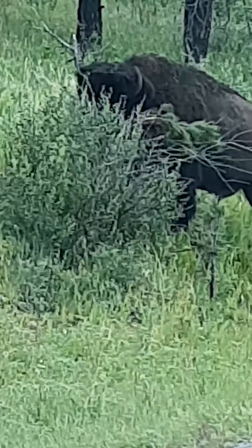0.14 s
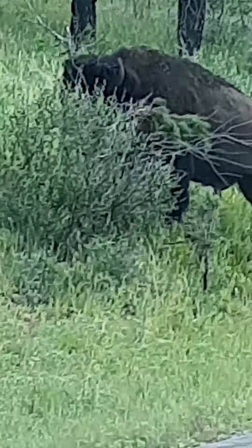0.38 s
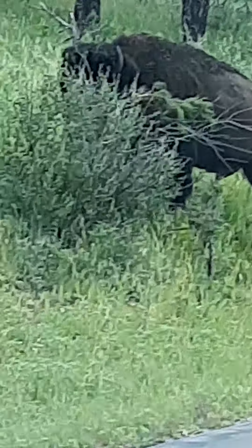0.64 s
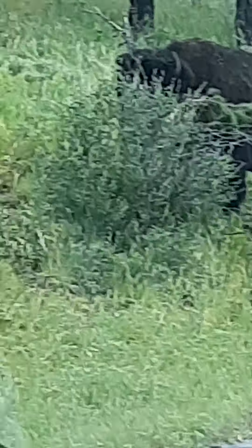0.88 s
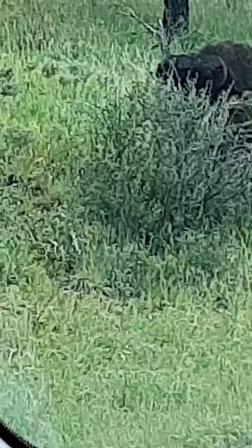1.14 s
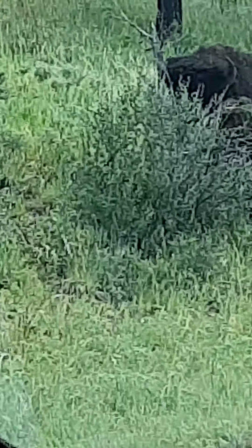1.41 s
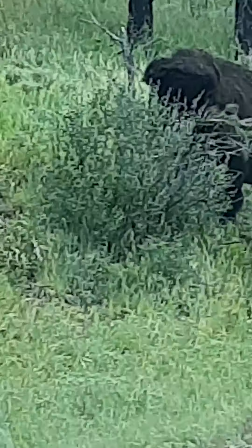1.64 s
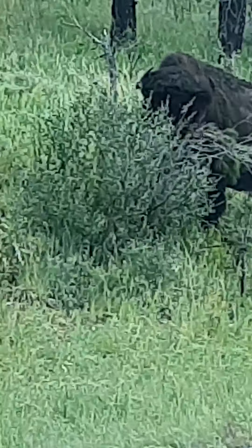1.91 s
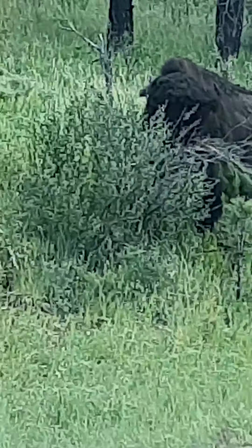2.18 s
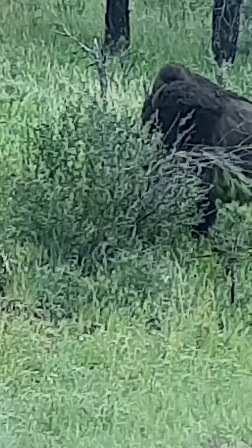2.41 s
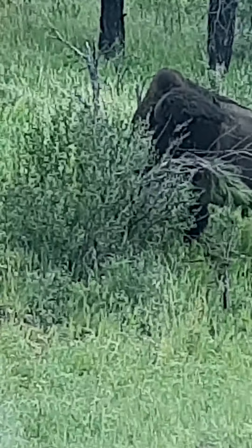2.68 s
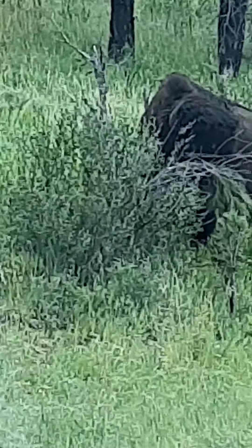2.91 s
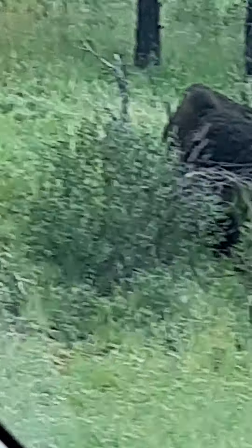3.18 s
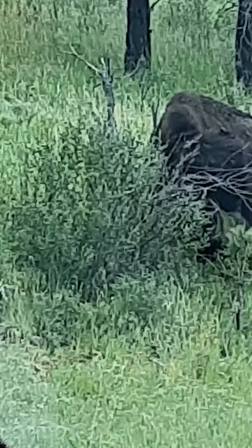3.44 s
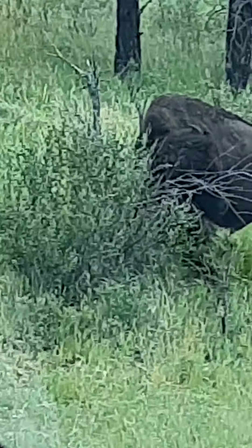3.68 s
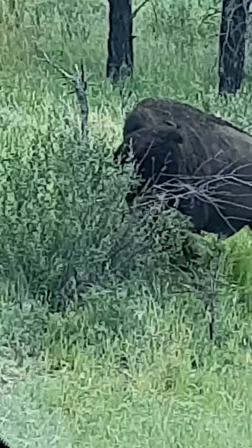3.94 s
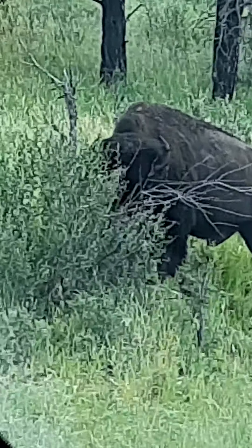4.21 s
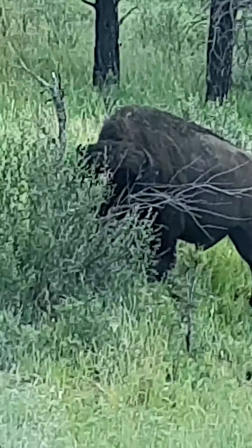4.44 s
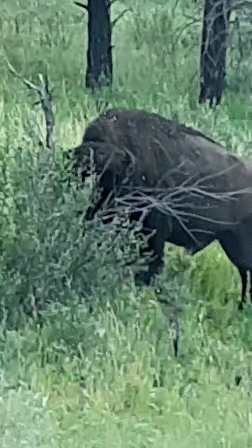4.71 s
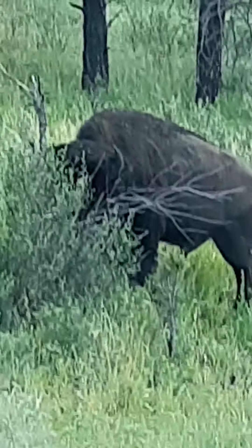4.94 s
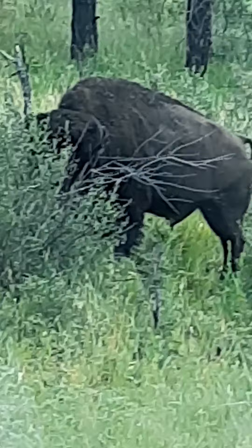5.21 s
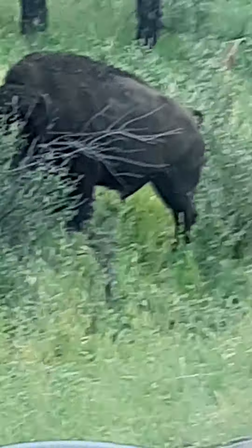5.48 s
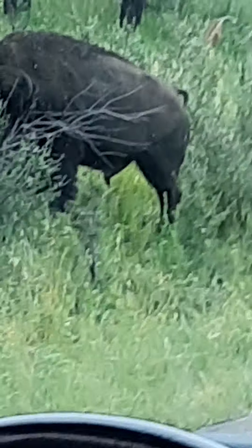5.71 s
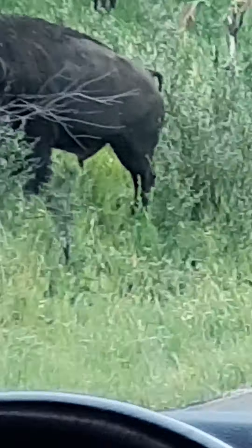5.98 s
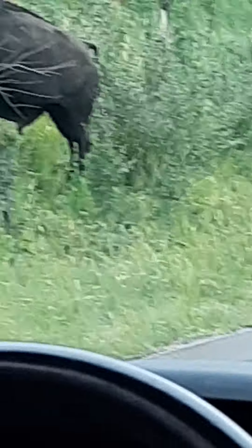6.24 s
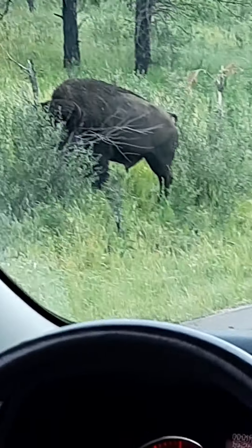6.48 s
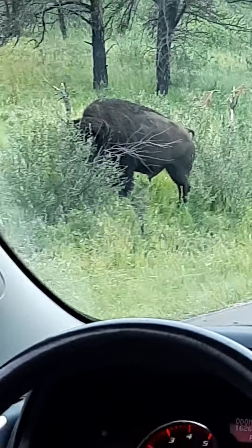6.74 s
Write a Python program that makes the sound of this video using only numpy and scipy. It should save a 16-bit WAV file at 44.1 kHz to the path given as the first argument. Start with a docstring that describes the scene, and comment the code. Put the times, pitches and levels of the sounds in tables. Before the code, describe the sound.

Inside a slowly rolling car, recorded on a handheld stereo phone. A low, rounded engine boom near 70 hertz swells in from the start, wavering in strength, and climbs to about 82 hertz by 2.4 s, with a thicker buzz of higher engine tones, then sinks. Beneath are soft road rumble and faint airy hiss; cloth rustles lightly, more noticeably from 0.6 to 1.8 s. Around 3.1 s come faint dashboard knocks and thin rubbing squeaks to 3.5 s, with tiny ticks. Muffled low bumps cluster from 4.0 to 5.5 s. At 4.7 s the driver lifts off; the boom drops sharply and pitch falls to 56. Small taps at 5.5 s lead to one very loud, dry, bright snap at 5.59 s, hard right. Rustle swells near 6 s, the engine revives modestly with a very faint whine, low bodywork groans, and brittle trim creaks click at 6.2 to 6.75 s.

```python
"""A six-cylinder engine booms in the cabin of a slowly rolling car until the driver lifts off: sines
on the crankshaft orders. Soft bumps and groans are swelling low notes; road rumble, air hiss and
cloth rustle are flickering coloured noise. Trim creaks, dashboard knocks and a finger snapping on the
phone case beside the right microphone set damped sines ringing. Loose parts tick, and thin squeaks
are rough rising tones."""
import sys
import numpy as np
from scipy import signal
from scipy.fft import rfft, irfft, next_fast_len
from scipy.io import wavfile
from scipy.ndimage import uniform_filter1d

SR = 44100
rng = np.random.default_rng(int(sys.argv[2]) if len(sys.argv) > 2 else 0)


def wav_out(sig):
    """Save sig, one row per channel (or a flat mono array), as 16-bit PCM at SR to the path in sys.argv[1]."""
    wavfile.write(sys.argv[1], SR, np.round(np.clip(np.atleast_2d(sig).T, -1, 1) * 32767).astype(np.int16))


def makeup_ratio(level_db):
    """Linear amplitude ratio for a level in decibels (20 dB per factor of ten)."""
    decades = np.asarray(level_db, float) / 20
    return 10 ** decades


N = 302676
T = np.arange(N) / SR  # time of each sample in seconds

# How fast the cylinders fire, three times a crankshaft turn: [t/s, f/Hz]
FIRING_RATE = [(0, 66.96), (.15, 68.97), (.5, 71.62), (1.35, 76.07), (1.8, 81.25), (2.4, 82.3), (2.6, 80.9),
               (2.8, 78.15), (3, 76.38), (3.35, 73.65), (4, 72.08), (4.72, 68.24), (5.06, 61.54),
               (5.35, 56.15), (5.8, 56.12), (6.2, 63), (6.6, 65.54), (6.86, 65.2)]
# Loudness of the firing boom: [t/s, level/dB]
BOOM_LEVEL = [(0, -36.5), (.27, -28.5), (.53, -23.5), (.69, -27), (.82, -39), (.97, -29.5), (1.36, -26.5),
              (1.57, -29.5), (1.97, -25), (2.62, -27.5), (2.81, -31.5), (2.98, -27), (3.28, -25.5),
              (4.07, -26.5), (4.39, -24), (4.53, -28.5), (4.68, -28), (4.89, -51), (5.1, -37.5),
              (5.33, -52), (5.5, -39), (5.76, -39.5), (5.88, -48), (6.1, -42), (6.38, -56), (6.5, -37),
              (6.7, -42), (6.86, -52)]
# Engine tones in three families: [order/cycles per crankshaft turn, level within its family/dB]
SHAKE_ORDERS = [(1.5, -6), (2, -7), (2.5, -17)]
EXHAUST_ORDERS = [(3.5, -14.5), (4, -3), (4.5, -6.5), (5, -11), (6, 0), (7, -10.5), (8, -7.5), (9, -9.5)]
INTAKE_ORDERS = [(10.5, -2.5), (12, -0.5), (13.5, -11.5), (15, 2.5)]
# Loudness of the gear whine: [t/s, level/dB]
WHINE_LEVEL = [(0, -70), (.5, -66), (1, -79.5), (6.2, -79), (6.45, -61), (6.86, -66)]
# Finger taps on the case: [t/s, peak level at the right port/dB, left minus right/dB]
CASE_TAPS = [(5.513, -34, -18), (5.5193, -22.5, -29), (5.58, -35, -23), (5.5908, -2.5, -46),
             (6.0525, -48, -8), (6.072, -46, -8), (6.079, -54, -8)]
# Ringing notes of the case, then of its back plate: [f/Hz, level/dB, time to fall 60 dB/s]
CASE_MODES = [(888.6, -12, 0.023), (1520, 0, 0.0045), (2600, 4.5, 0.0031), (3780, 8.5, 0.0014),
              (5760, -4, 0.0046), (8300, -7.5, 0.0019), (11140, 1, 0.0028), (11800, -4.5, 0.0022),
              (13900, 4, 0.0013)]
BACK_PLATE_MODES = [(390, 0, 0.036)]
# Soft bumps that drum a cabin panel: [t/s, peak level of the note/dB, f/Hz]
PANEL_BUMPS = [(3.686, -43, 269), (4.029, -43, 329), (4.092, -34.5, 297.8), (4.139, -38, 287),
               (4.223, -44.5, 313), (4.322, -37, 314), (4.36, -40, 336), (4.396, -33, 303),
               (4.549, -39, 295.4), (4.58, -36.5, 316), (4.6, -33.5, 326), (4.64, -40, 370),
               (4.846, -34, 290), (4.876, -37.5, 298.2), (4.897, -37.5, 323), (5.035, -40, 303.8),
               (5.07, -37, 289), (5.126, -41, 298), (5.236, -35, 295), (5.274, -37.5, 325),
               (5.315, -46, 292), (5.462, -28.5, 292), (5.482, -32, 317.7), (6.066, -38.5, 325),
               (6.152, -42, 287), (6.239, -41, 316), (6.505, -42, 300), (6.676, -36, 292)]
# Low notes in the bodywork: [t/s, peak level/dB, starting f/Hz]
BODY_GROANS = [(6.35, -41.5, 248.3), (6.4, -43, 353), (6.56, -50, 211)]
# Creaks of the trim, then knocks in the dashboard: [t/s, peak level at the right port/dB, scrape/s]
TRIM_CREAKS = [(4.605, -47.5, 0.016), (4.649, -47.5, 0.012), (5.536, -41.5, 0.024), (6.21, -44, 0.0076),
               (6.218, -42, .004), (6.2278, -34, 0.0027), (6.232, -38.5, .005), (6.278, -46, 0.012),
               (6.293, -45.5, 0.013), (6.482, -36.5, 0.0025), (6.5247, -30.5, 0.0027),
               (6.5442, -29.5, 0.0036), (6.557, -33.5, 0.002), (6.565, -38, 0.0022), (6.5744, -32, 0.002),
               (6.583, -36.5, .002), (6.589, -44, .002), (6.7286, -36.5, .0016), (6.733, -41, 0.0018),
               (6.7364, -34, 0.0027), (6.744, -38, 0.0065)]
DASH_KNOCKS = [(3.063, -39.5, 0.0036), (3.074, -40.5, .0035), (3.088, -51, 0.013)]
# Ringing notes of trim, dry clatter and dashboard: [f/Hz, level/dB, time to fall 60 dB/s]
TRIM_MODES = [(1140, -20, 0.02), (1770, 2, 0.055), (2170, 3, 0.018), (2600, -1, 0.022), (2920, -9, .016),
              (4520, -24, 0.028)]
CLATTER_MODES = [(2330, 7, 0.0092), (5590, -2.5, 0.012), (6170, -4.5, 0.013), (7100, -10, 0.0046),
                 (11440, -4.5, 0.0034)]
DASH_MODES = [(1480, 11, 0.032), (1680, 5, .02), (2180, 5, .022), (2600, -3, 0.015), (2990, 3, 0.025),
              (3250, 0, 0.02), (4190, -4, .012)]
# Thin rubbing squeaks: [t/s, length/s, peak level before the stutter/dB, starting f/Hz]
RUB_SQUEAKS = [(3.082, .1, -61, 1500), (3.18, .18, -68, 1520), (3.36, .055, -61, 1555),
               (3.415, .055, -64, 1570)]
# Faint ticks of loose parts: [t/s, peak level at the right port/dB, f/Hz]
LOOSE_TICKS = [(.229, -49, 710), (1.144, -49, 11000), (2.616, -51.5, 2640), (2.781, -54, 2600),
               (2.97, -54, 2600), (3.2202, -45.5, 2750), (3.462, -47, 2700), (3.701, -50.5, 2795),
               (3.919, -48, 11140), (5.292, -55, 1542), (5.307, -51, 1340), (5.345, -52, 2617),
               (5.521, -37, 460), (6.028, -42, 846), (6.029, -50, 2600)]
# Cloth rustle over time: [t/s, level/dB, brightness/dB per octave]
RUSTLE_LEVEL = [(0, -76, 3), (.2, -79.5, 2), (.38, -69.5, 2.5), (.44, -66.5, 1), (.52, -70.5, -1),
                (.63, -61.5, -1), (1.18, -63, 1), (1.28, -68.5, 0.5), (1.51, -64.5, -1.5), (1.89, -74, 0),
                (2.3, -75, 0), (2.69, -77.5, -1.5), (3.06, -68.5, -2), (3.4, -71, 2), (3.53, -77, 2),
                (3.69, -67, -1), (3.9, -67, -3.5), (4.15, -66, 2), (4.27, -69.5, -1), (4.45, -67, 1.5),
                (4.59, -70, 1), (4.62, -66, -0.5), (4.7, -73, -0.5), (4.83, -75.5, 2.5), (4.93, -69, 0.5),
                (5.37, -78, -2.5), (5.48, -73.5, 5), (5.53, -65.5, -3.5), (5.96, -59, 0),
                (6.02, -64.5, -1.5), (6.19, -69, -1), (6.27, -65.5, -3), (6.3, -61, 0.5), (6.34, -66, -2.5),
                (6.46, -68.5, 1), (6.6, -65, -5), (6.65, -80.5, 0.5), (6.86, -65.5, -2)]
# Loudness of the air hiss: [t/s, level/dB]
HISS_LEVEL = [(0, -63.5), (.65, -61.5), (1.25, -63), (1.6, -59), (1.9, -62.5), (2.4, -60), (3.4, -62),
              (5.2, -63.5), (5.48, -66.5), (5.8, -61), (6.35, -65), (6.86, -65)]
# Colours of the three noises: [f/Hz, level/dB per Hz]
CLOTH_COLOUR = [(880, -29.5), (1500, -5), (2020, -1.5), (2270, -4), (2450, -4), (2850, -5.5), (3110, -4),
                (3530, -14.5), (4260, -8), (5150, -9), (5500, -4), (5900, -4), (6900, -6), (9280, -16.5),
                (12000, -6.5), (15200, -12.5), (15800, -19.5)]
AIR_COLOUR = [(290, -26), (500, -3), (561, -11.5), (817, -6.5), (1170, -17.5), (1260, -9.5), (1370, -14),
              (1780, -12), (2180, -16.5), (2870, -21), (3620, -33.5), (5580, -40), (7140, -44.5),
              (8250, -37.5), (15800, -52)]
ROAD_COLOUR = [(13, -59), (22, -33.5), (32, -17.5), (46, -4.5), (64, -0.5), (86, -2), (125, -2), (157, -5),
               (236, -14), (266, -5), (326, -7.5), (387, -13), (421, -18.5), (1300, -39.5), (1690, -71.5),
               (2860, -120)]
# How alike noise is at the two microphones: [f/Hz, likeness/0 to 1]
MIC_LIKENESS = [(60, 0.97), (130, 1), (290, 0.97), (640, 0.6), (1410, 0.7), (3100, 0), (6820, 0),
                (15000, 0)]
# The right port sits in a recess with its own resonances: [f/Hz, left minus right/dB]
MIC_LEAN = [(60, -1), (110, 2.5), (200, 4), (380, 0.5), (700, 2), (1300, -4.5), (2000, -9), (2800, -14.5),
            (3500, -3), (4300, -1), (5000, -6), (6000, -13.5), (7500, 4), (9500, 7), (12000, -3.5),
            (15500, 1)]

PORT_LAG_S = .0004  # travel time between the two ports
# the driver lifts off, then goes back on the throttle; each change fades over COAST_S
THROTTLE_OFF_S, THROTTLE_ON_S, COAST_S = 4.7, 5.98, 0.22


def columns(table):
    """Each column of a curve, joined by straight lines in time."""
    seconds, *rest = np.transpose(table)
    return [np.interp(T, seconds, column) for column in rest]


def along(table, hz):
    """A spectrum read on a log-frequency axis."""
    table_hz, values = np.transpose(table)
    return np.interp(np.log(hz + 1), np.log(table_hz + 1), values)


def walk(rate):
    """A smooth random wander: levels held 1 / rate seconds and slewed twice; spread near 1."""
    hold = int(SR / rate)
    steps = np.repeat(rng.standard_normal(N // hold + 1), hold)
    return 1.58 * uniform_filter1d(uniform_filter1d(steps, hold), hold)[:N]


def pan(x, db):
    """Left and right of a sound; positive db turns the right side down, negative db the left."""
    return x * makeup_ratio([[min(db, 0)], [-max(db, 0)]])


def add(out, s, sound):
    """Lay a sound down at a time."""
    i = int(s * SR)
    out[:, i:i + sound.shape[1]] += sound[:, :N - i]


def noise(colour, flicker_db, rate, tilt_db=0):
    """Two-microphone noise in octave bands that each flicker alone; the left-right mean has rms 1."""
    size = next_fast_len(N)
    hz = np.arange(size // 2 + 1) * SR / size
    low_hz, high_hz = colour[0][0], colour[-1][0]
    like = np.clip(along(MIC_LIKENESS, hz), 0, 1)
    shared, apart = rfft(rng.standard_normal((2, size)))
    pair = np.array([np.sqrt(1 + like) * shared + sign * np.sqrt(1 - like) * apart for sign in (1, -1)])
    lean = along(MIC_LEAN, hz) / 2
    pair = pair * makeup_ratio(along(colour, hz) + np.array([lean, -lean]))
    pair = pair * (hz > low_hz) * (hz < high_hz)
    pair = pair * np.clip(hz / 36, 0, 1) ** 4  # less deep bass
    pair[1] *= np.exp(-2j * np.pi * hz * PORT_LAG_S / 2)  # the right port hears it half the lag later
    octave, out = np.log2(hz + 1), 0
    for k in range(int(np.log2(low_hz)), int(np.log2(high_hz)) + 2):
        band = np.cos(np.pi / 2 * np.clip(octave - k, -1, 1)) ** 2
        level_db = flicker_db * walk(rate) + tilt_db * (k - np.log2(6000))
        out = out + irfft(pair * band, size)[:, :N] * makeup_ratio(level_db)
    return out / np.sqrt(np.mean(out.mean(0) ** 2))


def ring(modes, size=4096):
    """What a body gives back for one tick: damped sines, peak 1."""
    t = np.arange(size) / SR
    out = sum(makeup_ratio(db - 60 * t / t60) * np.sin(2 * np.pi * hz * t) for hz, db, t60 in modes)
    return out / np.abs(out).max()


def soft_ring(modes):
    """A ringing body that takes a fraction of a millisecond to get going."""
    return ring(modes) * (1 - np.exp(-np.arange(4096) / (.0003 * SR)))


def slips(events, bodies, pan_db):
    """A slip ticks a part and scrapes it for a few milliseconds."""
    out = np.zeros((2, N))
    t = np.arange(2048) / SR
    grits = rng.standard_normal((len(events), 2, len(t)))
    for (s, db, length), body, grit in zip(events, bodies, grits):
        age = t / max(length, .001)
        scrape = 0.16 * grit * np.exp(-age) * np.minimum(1, 0.32 + age)
        scrape[:, 0] += min(1, (.006 / length) ** 2)  # scrapes over 6 ms start with a weaker tick
        sound = np.diff(signal.fftconvolve(scrape, body[None]))  # small parts radiate no bass
        sound = sound / np.abs(sound).max(1, keepdims=True)
        add(out, s, pan(makeup_ratio(db) * sound, pan_db))
    return out


def coasting():
    """1 while the driver is off the throttle, 0 while on it, with a ramp between."""
    return np.clip(np.minimum(T - THROTTLE_OFF_S, THROTTLE_ON_S + COAST_S - T) / COAST_S, 0, 1)


def rev_law(hz, top_db, knee_hz, db_per_hz, low_db):
    """A tone family grows louder with the firing rate, up to a knee."""
    return np.clip(top_db + db_per_hz * (hz - knee_hz), low_db, top_db)


def engine():
    """Sines on the crankshaft orders; the weak ones waver as combustion varies."""
    (hz,), (boom_db,), (whine_db,) = columns(FIRING_RATE), columns(BOOM_LEVEL), columns(WHINE_LEVEL)
    shake_db = rev_law(hz, top_db=-36.5, knee_hz=76, db_per_hz=1.9, low_db=-57)
    # the exhaust gets thinner as the revs rise, and quieter off throttle
    exhaust_db = -49.5 - 0.24 * (hz - 75) - 2.6 * coasting()
    intake_db = rev_law(hz, top_db=-52, knee_hz=77, db_per_hz=3, low_db=-62)
    intake_db = intake_db + 1 * (T > THROTTLE_ON_S) * (1 - coasting())  # pulls 1 dB harder back on throttle
    crank = 2 * np.pi * np.cumsum(hz / 3 * (1 + .002 * walk(12))) / SR
    tones = makeup_ratio(boom_db + .6 * walk(16)) * np.sin(3 * crank)  # the firing boom is order 3
    families = ((SHAKE_ORDERS, shake_db), (EXHAUST_ORDERS, exhaust_db), (INTAKE_ORDERS, intake_db))
    for family, family_db in families:
        for order, db in family:
            phase = order * crank + 0.017 * order * walk(8) + 7 * rng.random()
            tones = tones + makeup_ratio(family_db + db + 2.63 * walk(10)) * np.sin(phase)
    tones = np.sqrt(2) * tones  # so that levels are rms
    # the gear whine has 31 teeth a crankshaft turn
    whine = makeup_ratio(whine_db + 3 * walk(14)) * np.sin(31 * crank + 1.5 * walk(25))
    # the tones reach the left port first
    both = np.array([tones, np.interp(T - PORT_LAG_S, T, tones)])
    return pan(both, -.7) + pan(whine, 8)


def taps():
    """Dry snaps ring the case; they are loudest at the nearer, right port."""
    out = np.zeros((2, N))
    # the nail bends the case one way, then lets it spring back harder
    push = np.zeros(16)
    push[:7], push[8:15] = .55 * np.hanning(7), -np.hanning(7)
    snap = np.convolve(ring(CASE_MODES), push)
    high_pass = signal.butter(3, 750, "high", fs=SR, output="sos")
    snap = signal.sosfilt(high_pass, snap)  # too small for bass
    snap = snap / np.abs(snap).max()
    # the back plate swells and hums on after the release
    plate_swell = np.minimum(1, np.arange(4096) / (0.0042 * SR))
    snap[len(push) - 1:] -= makeup_ratio(-17) * ring(BACK_PLATE_MODES) * plate_swell
    # three ever louder slips, 0.65 ms apart, before the strongest snap
    judder = [(5.5889 - k * .00065, -15.5 - k * 5.5, -36) for k in range(3)]
    for s, db, pan_db in [*CASE_TAPS, *judder]:
        add(out, s, pan(makeup_ratio(db) * snap, pan_db))
    return out


def bumps():
    """Each bump swells and dies on a panel note, with a duller thud about an octave under."""
    out = np.zeros((2, N))
    rise_s, thud_db = 0.0094, -46  # the thud is as strong under every bump
    t = np.arange(int(10 * rise_s * SR)) / SR
    swell = t / rise_s * np.exp(1 - t / rise_s)
    for (s, db, hz), turn in zip(PANEL_BUMPS, rng.random((len(PANEL_BUMPS), 2))):
        note = makeup_ratio(db) * np.sin(2 * np.pi * (hz * t + turn[0]))
        thud = makeup_ratio(thud_db) * np.sin(2 * np.pi * (0.463 * hz * t + turn[1]))
        add(out, s, np.array([swell * (note + thud)] * 2))
    return out


def groans():
    """Low bodywork notes swell for longer than the bumps and sag in pitch as they fade."""
    out = np.zeros((2, N))
    rise_s, sag_per_s = 0.053, .5
    t = np.arange(int(6 * rise_s * SR)) / SR
    swell = t / rise_s * np.exp(1 - t / rise_s)
    for s, db, hz in BODY_GROANS:
        note = np.sin(2 * np.pi * hz * (t - sag_per_s * t ** 2 / 2))
        add(out, s, np.array([makeup_ratio(db) * swell * note] * 2))
    return out


def creaks():
    """Slipping trim rings with some dry clatter, which leads in the quieter creaks."""
    bodies = []
    for _, db, _ in TRIM_CREAKS:
        # each slip catches the trim at another spot and favours other modes
        grip_db = 1.5 * rng.standard_normal(len(TRIM_MODES))
        gripped = [(hz, mode_db + g, t60) for (hz, mode_db, t60), g in zip(TRIM_MODES, grip_db)]
        clatter_db = -12 + .8 * max(-38 - db, 0)  # grows for peaks under -38 dB
        body = soft_ring(gripped) + makeup_ratio(clatter_db) * ring(CLATTER_MODES)
        bodies.append(np.convolve(body, np.hanning(5)))
    return slips(TRIM_CREAKS, bodies, pan_db=-13.5)


def knocks():
    """The dashboard slips and rings too, its padding muffling the treble."""
    padding = signal.butter(4, 3600, fs=SR, output="sos")
    padded = signal.sosfilt(padding, soft_ring(DASH_MODES))
    return slips(DASH_KNOCKS, [padded] * len(DASH_KNOCKS), pan_db=-7)


def squeaks():
    """Short rough rubbing tones that rise and stutter."""
    out, climb_hz_per_s = 0, 500
    wobble, stutter = 1 + .012 * walk(150), makeup_ratio(2.5 * walk(60))
    for s, length, db, hz in RUB_SQUEAKS:
        swell = np.sqrt(np.sin(np.pi * np.clip((T - s) / length, 0, 1)).clip(0))
        pitch = (hz + climb_hz_per_s * (T - s).clip(0, length)) * wobble
        out = out + makeup_ratio(db) * swell * np.sin(2 * np.pi * np.cumsum(pitch) / SR)
    return pan(out * stutter, -3)


def ticks():
    """Loose parts give one soft note each that quickly dies away."""
    out = np.zeros((2, N))
    t = np.arange(1024) / SR
    for s, db, hz in LOOSE_TICKS:
        rise = t / min(.001, 2.0 / hz)  # peaks after 1 ms or two cycles, whichever is shorter
        note = rise * np.exp(1 - rise) * np.sin(2 * np.pi * hz * t)
        add(out, s, pan(makeup_ratio(db) * note, -11.5))
    return out


def cloth():
    """Fibres catch in quick bursts across the whole treble: flickering noise of changing brightness."""
    rustle_db, tilt_db = columns(RUSTLE_LEVEL)
    bursts = makeup_ratio(rustle_db + 1.0 * walk(60) + 0.97 * walk(9))
    return bursts * noise(CLOTH_COLOUR, flicker_db=0.71, rate=16, tilt_db=tilt_db)


def air():
    """Air hisses as coloured noise that slowly comes and goes."""
    return makeup_ratio(columns(HISS_LEVEL)[0]) * noise(AIR_COLOUR, flicker_db=1.0, rate=13)


def road():
    """Road rumble is bass-heavy noise, 4 dB softer while coasting."""
    return makeup_ratio(-41.5 - 4 * coasting()) * noise(ROAD_COLOUR, flicker_db=1.3, rate=9)


def scene():
    """Engine, the small sounds near the phone, air and road, all added up."""
    near = taps() + bumps() + groans() + creaks() + knocks() + squeaks() + ticks()
    return engine() + near + cloth() + air() + road()


def low_pass(x):
    """Removes everything above the highest recorded frequency."""
    return signal.sosfilt(signal.butter(12, 16640, fs=SR, output="sos"), x)


def record(dry):
    """The finished mix is kept on the phone."""
    return low_pass(dry)


dry = scene()
out = record(dry)
wav_out(out)
```